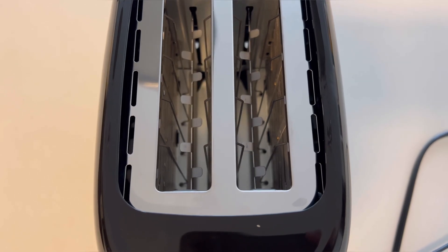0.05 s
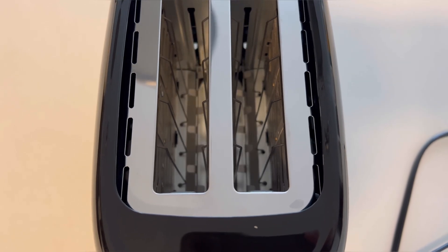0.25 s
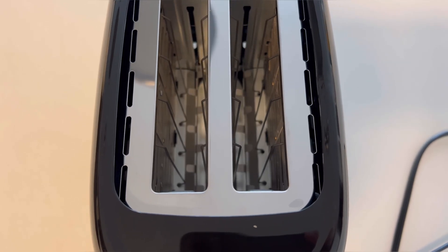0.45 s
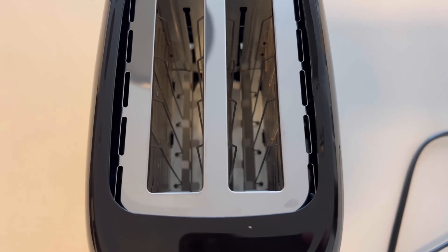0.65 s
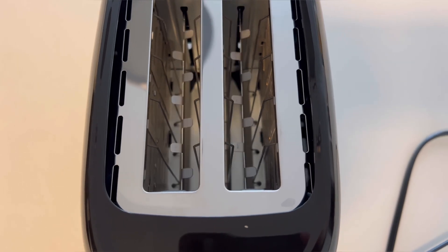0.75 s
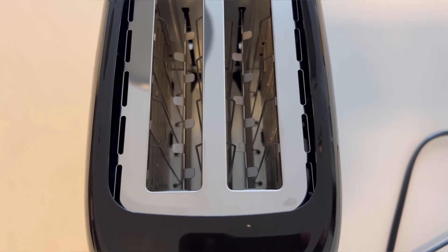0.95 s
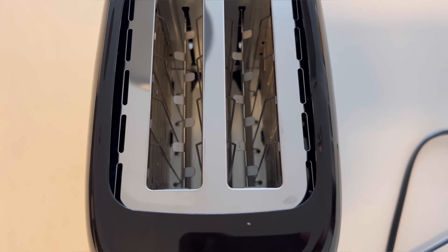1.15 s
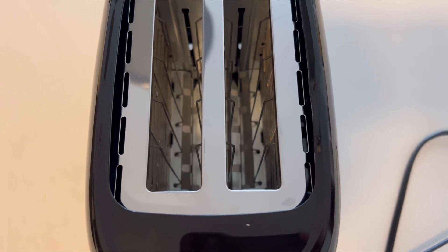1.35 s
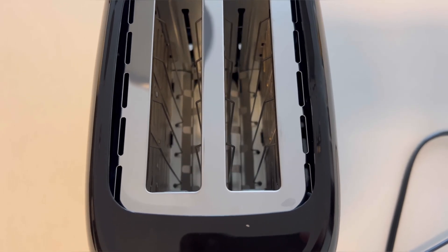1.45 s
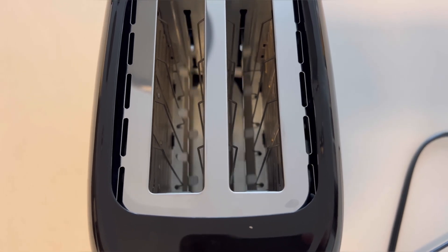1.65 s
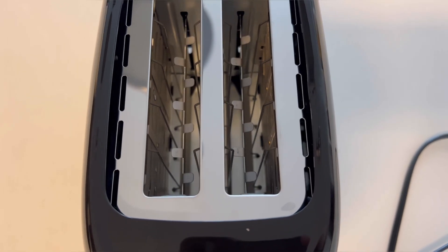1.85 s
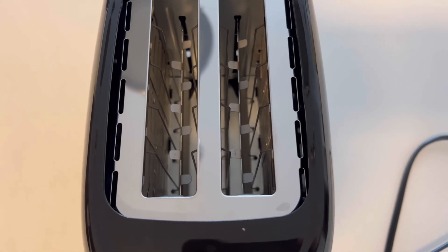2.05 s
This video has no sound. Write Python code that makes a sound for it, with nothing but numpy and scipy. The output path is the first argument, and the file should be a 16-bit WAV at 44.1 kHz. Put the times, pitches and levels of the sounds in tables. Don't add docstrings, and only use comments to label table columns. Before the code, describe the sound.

Toaster lever pushed down and let up twice, sharp metallic clacks with scrapes and rattling racks

```python
import sys
import numpy as np
from scipy import signal
from scipy.fft import rfft, irfft
from scipy.io import wavfile
from scipy.ndimage import uniform_filter1d

SR = 44100
rng = np.random.default_rng(int(sys.argv[2]) if len(sys.argv) > 2 else 0)


def unload_audio(sound):
    columns = np.transpose(np.atleast_2d(sound))
    steps = np.round(np.clip(columns, -1, 1) * 32767)
    wavfile.write(sys.argv[1], SR, steps.astype(np.int16))


def ratio(d):
    e = np.asarray(d, float) / 20
    return 10 ** e


N = 92610

# t/s, blow level/dB, thud level/dB, rattle level/dB, rattle t60/s
STOPS = [
    (.2155, -5.5, -20, -23.5, 0.33),
    (.7363, -8.5, -21, -23.5, 0.24),
    (1.3625, -5.5, -23.5, -22, 0.28),
    (1.6953, -7, -19, -22.5, 0.39),
]
# delay/s, level/dB, fall/s
REBOUNDS = [(0.013, -13.5, 0.0008), (0.012, -17, 0.0049), (0.0096, -14, 0.0024), (0.0127, -11, 0.011)]
# f/Hz, level/dB
BLOWS = [
    [(240, -38.5), (400, -19), (956, -10), (1700, -2), (1990, -6.5), (6800, -7), (9570, -2.5),
     (15300, -20.5), (16500, -34.5)],
    [(240, -37), (400, -18.5), (971, -10.5), (2220, -4.5), (3940, -15), (8720, -4), (14100, -14),
     (15500, -9), (16500, -30)],
    [(240, -45), (400, -24.5), (1700, 0.5), (2020, -12.5), (5380, -15), (5910, -10), (9570, -3.5),
     (15700, -21.5), (16500, -17)],
    [(240, -37.5), (400, -14), (1130, -11), (2760, 2.5), (4130, -14), (5640, -5.5), (8720, -3),
     (15300, -14), (16500, -44)],
]
# f/Hz, level at down stop/dB, level at up stop/dB, t60/s, rise/s
HOUSING = [(151, -7, 0, 0.13, 0.017), (218.3, -13, 1, 0.15, 0.012), (240.7, -1, -7, 0.17, 0.012),
           (327.5, 5.5, 6, 0.093, 0.027), (387, -21.5, -9.5, 0.07, 0.02), (418.5, -8, -3.5, 0.16, 0.0079),
           (493.2, -6.5, -8.5, 0.24, 0.0024), (540.5, -1.5, -8.5, 0.22, 0.03)]
# t/s, scrape level/dB, brightness/dB
STROKES = [
    [(.085, -74, -26), (.114, -46.5, -32), (.128, -35.5, -53), (.185, -34.5, -3), (.203, -31, -11),
     (.214, -20.5, -3.5)],
    [(.6075, -40, 1), (.611, -35, -9), (.645, -44, 3), (.69, -46, 16), (.71, -44.5, 12.5), (.733, -49, 7.5)],
    [(1.235, -70, -29), (1.25, -41.5, -12), (1.295, -32.5, -16), (1.315, -29.5, -10), (1.33, -33, -5.5),
     (1.344, -23, -12), (1.361, -30.5, -1)],
    [(1.57, -50, -19), (1.6, -36.5, -10), (1.618, -40, -5), (1.636, -46, 11), (1.641, -32.5, -1.5),
     (1.67, -41, 11.5), (1.693, -41.5, 6.5)],
]
# f/Hz, level/dB
SCRAPE = [(350, -39.5), (600, -18.5), (950, -11), (1300, 2), (2800, 0.5), (4740, -7.5), (6400, -6),
          (9740, -8), (15400, -18), (16500, -17.5)]
# f/Hz, level/dB
RATTLE = [(350, -35), (600, -8.5), (2210, -5.5), (2720, -3), (5080, -9.5), (9610, -8), (15200, -17.5),
          (16500, -42)]
# f/Hz, side minus mid level/dB
WIDE = [(300, -3), (600, 14), (1200, -16), (2500, -6), (5000, 1.5), (8500, -11.5), (14000, 0.5)]
# f/Hz, level/dB, t60/s
PANELS = [(1322, -5, 0.017), (1700, -7, 0.015), (2030, -10, 0.04), (2204, -8, 0.025), (2750, -6, 0.04),
          (6260, -7, .025), (8540, -6, .025), (9030, -8, 0.015), (9845, -6, 0.02)]
# t/s, level/dB, brightness/dB
KNOCKS = [(.125, -36, -20), (.1918, -38, 0), (.2008, -31, -6), (0.381, -40, 0), (0.6101, -35.5, 0),
          (0.971, -68, 14), (1.3015, -34, -10), (1.3174, -32, -8), (1.3358, -31, -8), (1.3408, -26, -3),
          (1.4356, -38, 4), (1.5734, -44, 4), (1.6387, -36, -6), (1.8385, -57, 12), (1.912, -63, 12),
          (1.98, -66, 12)]
# t/s, level/dB, f/Hz, t60/s
TICKS = [(.755, -30, 1750, .03), (.764, -30, 2700, .05), (1.2695, -31, 6500, 0.04), (1.281, -33, 2800, .02),
         (1.284, -32, 1600, .03), (1.318, -28, 2900, .02), (1.32, -28, 1400, .03), (1.341, -23, 6460, 0.04),
         (1.341, -28, 8700, .03), (1.405, -29, 2700, .1), (1.6033, -28, 1300, 0.03),
         (1.6033, -26, 2700, .012), (1.6033, -27, 2200, .01), (1.6033, -28, 3200, .01),
         (1.6033, -35, 4400, .01), (1.6388, -29, 3300, .02), (1.64, -31, 1300, .03),
         (1.642, -31, 2000, 0.06), (1.751, -30, 2350, .05)]
# t/s, level/dB, f/Hz, length/s
BUMPS = [
    (.224, -26, 84, .048),
    (.742, -32, 100, .045),
    (1.368, -26, 72, .042),
    (1.728, -26, 110, .042),
    (.608, -40, 420, .03),
]
# t/s, level/dB, f/Hz, t60/s
SPRING = (1.745, -41.5, 948, .8)
# f/Hz, t60/s
ROOM = [(200, 1), (1000, 0.83), (3000, 0.89), (8000, 0.73), (15000, 0.38)]
# f/Hz, level/dB
RUMBLE = [(30, -18), (45, -11.5), (60, -4), (130, -4), (240, -2), (380, -15.5), (520, -17), (640, -22.5),
          (900, -80.5)]
# f/Hz, level/dB
HISS = [(410, -37.5), (700, -6.5), (767, -2.5), (4610, -19), (13700, -44.5), (15200, -25), (16000, -56.5)]
# f/Hz, correlation
SAME = [(130, 1), (290, 0.89), (600, 0.09), (1400, 0.1), (6800, 0.24)]
# f/Hz, left minus right level/dB
TILT = [(100, -2.5), (200, 0), (380, -7.5), (800, -3.5), (3000, 1.5)]
# f/Hz, rms level/dB
HUM = [(60, -49.5), (241, -51)]

RAIL_PLACES, RACKS = 6, 3
PLACE = round(.012 * SR)


def evened(x):
    return x / np.sqrt(np.mean(x ** 2) + 1e-20)


def read(points, hz):
    f, value = np.transpose(points)
    return np.interp(np.log(hz + 1), np.log(f + 1), value)


def add(mix, s, sound):
    part = mix[:, round(s * SR):][:, :sound.shape[1]]
    part += sound[:, :part.shape[1]]


def signs(*shape):
    return rng.choice([-1., 1.], shape)


def clicks(count, per_s, spread_db):
    chance, side, size = rng.random((count, 3)).T
    sizes = ratio(-spread_db * np.log(size + 0.0021))
    return evened((chance < per_s / SR) * np.sign(side - .5) * sizes)


def tinted(x, bright_db, edge_hz):
    low = signal.sosfilt(signal.butter(1, edge_hz, "low", fs=SR, output="sos"), x)
    return low + (x - low) * ratio(bright_db)


def rings(hz, t60, count):
    t = np.arange(count) / SR
    y = np.sin(2 * np.pi * np.outer(hz, t)) * ratio(-60 * t / np.reshape(t60, (-1, 1)))
    return y / np.linalg.norm(y, axis=1, keepdims=True)


def strike(x, places):
    place = np.repeat(rng.integers(0, len(places), len(x) // PLACE + 1), PLACE)[:len(x)]
    out = 0
    for k, body in enumerate(places):
        out = out + signal.oaconvolve((x * (place == k))[None], body, axes=1)[:, :len(x)]
    return out


def metal(colour, panel_db, sheet):
    bins = np.fft.rfftfreq(sheet.shape[1], 1 / SR)
    p_hz, p_db, p_t60 = np.transpose(PANELS)
    z = rfft(signs(2, len(sheet)) @ sheet)
    z = z / np.sqrt(uniform_filter1d(abs(z) ** 2, size=24) + 1e-3)
    z = z * ratio(read(colour, bins))
    polarity = signs(2, len(p_hz))
    z[1] *= ratio(read(WIDE, bins))
    polarity[1] *= ratio(read(WIDE, p_hz))
    detune, favour = rng.standard_normal((2, len(p_hz)))
    panels = rings(p_hz * (1 + .025 * detune), p_t60, count=6000)
    level_db = panel_db + p_db + 4 * favour + read(colour, p_hz)
    body = (polarity * ratio(level_db)) @ panels
    add(body, 0, irfft(z)[:, :3000])
    return body / np.linalg.norm(body[0])


def bodies():
    jitter, spread = rng.standard_normal((2, 500))
    hz = np.linspace(500, 16500, 500) + 15 * jitter
    sheet = rings(hz, .011 * np.exp(.35 * spread), count=6000)
    blows = [metal(colour, (-17, -16)[k % 2], sheet) for k, colour in enumerate(BLOWS)]
    rail = [metal(SCRAPE, -17, sheet) for _ in range(RAIL_PLACES)]
    racks = [metal(RATTLE, -22, sheet) for _ in range(RACKS)]
    return blows, rail, racks


def stop(up, blow_db, thud_db, rattle_db, rattle_t60, rebound, blow_body, racks):
    t = np.arange(30000) / SR
    rise, fall = (0.0006, 0.0038) if up else (0.0042, 0.0023)
    later, back_db, back_fall = rebound
    push = np.minimum(t / rise, 1) ** 2 * np.exp(-np.maximum(t - rise, 0) / fall)
    back = np.clip((t - later) / 0.0012 + 1, 0, 1) * np.exp(-np.maximum(t - later, 0) / back_fall)
    chatter = (push + ratio(back_db) * back) * clicks(len(t), 9000, 0.3)
    blow = signal.fftconvolve(chatter[None], blow_body, axes=1)[:, :len(t)]
    fading = np.minimum(t / 0.015, 1) * ratio(-60 * t / rattle_t60)
    loose = fading * clicks(len(t), per_s=6000, spread_db=2.2)
    return ratio(blow_db) * blow + ratio(rattle_db) * strike(loose, racks) + housing(t, up, thud_db)


def housing(t, up, thud_db):
    y = np.zeros((2, len(t)))
    for hz, down_db, up_db, t60, rise_s in HOUSING:
        turn = rng.random(2)[:, None] + hz * rng.uniform(0.9, 1.05) * t
        level_db = thud_db + (up_db if up else down_db)
        shape = (1 - np.exp(-(t / rise_s) ** 2)) * ratio(level_db - 60 * t / t60)
        rocking = 1 + .5 * np.sin(2 * np.pi * (rng.random() + rng.uniform(23.8, 45) * t))
        mid, loose_side = shape * np.sin(2 * np.pi * turn) * rocking
        side = -0.1 * mid + loose_side * ratio(-13.5 + 8 * np.log2(hz / 400))
        y += [mid, side]
    return y


def scrape(rail):
    t, out = np.arange(N) / SR, np.zeros(N)
    grip_db = 1.1 * evened(uniform_filter1d(rng.standard_normal(N), size=250))
    slips = clicks(N, per_s=4500, spread_db=2.8) * ratio(grip_db)
    for stroke in STROKES:
        s, db, bright_db = np.transpose(stroke)
        on = (t > s[0]) & (t < s[-1] + .003)
        bright = tinted(slips, np.interp(t, s, bright_db) + 5, edge_hz=4500)
        out += on * ratio(np.interp(t, s, db)) * bright
    return strike(out, rail)


def knock(db, bright_db, body):
    t = np.arange(1500) / SR
    taps = np.exp(-t / 0.004) * clicks(len(t), per_s=6500, spread_db=2.6)
    for _ in range(2):
        taps = tinted(taps, bright_db, edge_hz=9000)
    return ratio(db) * signal.fftconvolve(taps[None], body, axes=1)


def tick(db, hz, t60):
    y = rings(hz * rng.uniform(1.0, 1.05, 4), t60 * np.ones(4), count=4000)
    rise = np.minimum(np.arange(y.shape[1]) / SR / .0012, 1) ** 2
    y = y / abs(y).max(1, keepdims=True) / len(y) * rise
    return ratio(db + 3.5) * np.array([y.sum(0), signs(len(y)) @ y * 0.48])


def bump(db, hz, length):
    t = np.arange(0, length, 1 / SR)
    push = np.sin(np.pi * (t / length) ** 1.2) ** 2
    return ratio(db) * np.outer([1, -.1], push * np.sin(2 * np.pi * (hz * t + rng.random())))


def spring(db, hz, t60):
    modes = rings(hz + np.array([0, 7., 24.]), t60 * np.ones(3), count=20000)
    return ratio(db) * np.outer([1, .3], [1, .6, .7] @ modes / modes.max())


def toaster():
    blows, rail, racks = bodies()
    mix = scrape(rail)
    for k, (s, *row) in enumerate(STOPS):
        add(mix, s, stop(k % 2, *row, REBOUNDS[k], blows[k], racks))
    for s, *row in TICKS:
        add(mix, s, tick(*row))
    for k, (s, *row) in enumerate(KNOCKS):
        add(mix, s, knock(*row, racks[k % RACKS]))
    for s, *row in BUMPS:
        add(mix, s, bump(*row))
    add(mix, SPRING[0], spring(*SPRING[1:]))
    return mix


def kitchen(x):
    taps = np.zeros((2, SR))
    at = np.arange(300, SR - 20, 20) + rng.integers(0, 20, (2, (SR - 301) // 20))
    np.put_along_axis(taps, at, signs(*at.shape), 1)
    hz, t, z = signal.stft(taps, SR, nperseg=256)
    same = np.clip(read(SAME, hz), .3, 1)[:, None]
    z[1] = same * z[0] + np.sqrt(1 - same ** 2) * z[1]
    tail = signal.istft(z * ratio(-60 * t / read(ROOM, hz)[:, None]), SR, nperseg=256)[1]
    return signal.fftconvolve(x[None], tail / np.linalg.norm(tail[0]), axes=1)[:, :N]


def air(colour, db, size):
    frames, hz = 4 * N // size + 5, np.fft.rfftfreq(size, 1 / SR)
    a, b, c, d, drift = rng.standard_normal((frames, len(hz), 5)).T
    swell_db = evened(uniform_filter1d(drift[0], size=8))
    patches = uniform_filter1d(drift, size=7, axis=0)
    patch_db = evened(uniform_filter1d(patches, size=5, axis=1))
    same = np.clip(read(SAME, hz), -1, 1)[:, None]
    left = a + 1j * b
    right = same * left + np.sqrt(1 - same ** 2) * (c + 1j * d)
    z = np.array([left, right * ratio(-read(TILT, hz))[:, None]])
    z = z * ratio(read(colour, hz)[:, None] + patch_db + swell_db)
    y = signal.istft(z, nperseg=size, noverlap=size - size // 4)[1][:, :N]
    return ratio(db) * y / np.std(y.mean(0))


def hum():
    t, out = np.arange(N) / SR, 0
    for hz, db in HUM:
        waver = evened(sum(np.sin(2 * np.pi * (f * t + rng.random())) for f in (.4, .9, 1.7, 3.1)))
        line = np.sin(2 * np.pi * (hz * t + rng.random()) + waver)
        out = out + np.sqrt(2) * ratio(db + 2.5 * waver) * line
    return out


def scene():
    mid, side = toaster()
    near = np.array([mid + side, mid - side]) * ratio(np.array([[-.5], [.5]]))
    floor = air(RUMBLE, -40, size=4096) + air(HISS, -57.5, size=1024) + hum()
    return near + ratio(-13) * kitchen(mid) + floor


def roll_off(x):
    return signal.sosfilt(signal.butter(12, 17130, fs=SR, output="sos"), x)


def record(dry):
    x = signal.sosfilt(signal.butter(2, 45, "high", fs=SR, output="sos"), dry)
    x = np.tanh(x / 1.577) * 1.45
    x = np.pad(x, ((0, 0), (127, 127)), "reflect")
    band = signal.firwin(255, 15800, window=("kaiser", 9), fs=SR)
    x = signal.oaconvolve(x, band[None], "valid", axes=1)
    return roll_off(x)


dry = scene()
out = record(dry)
unload_audio(out)
```